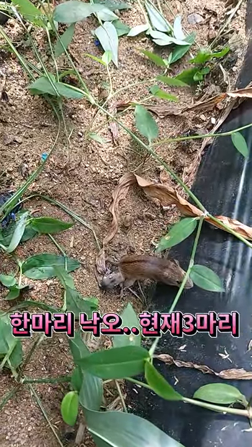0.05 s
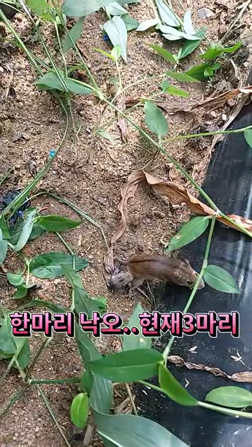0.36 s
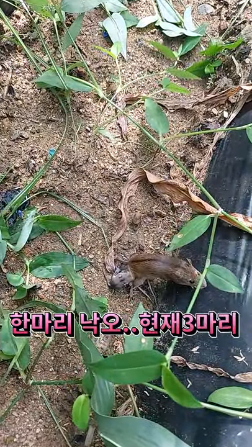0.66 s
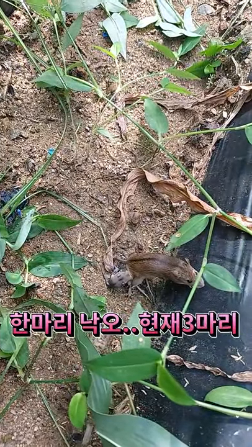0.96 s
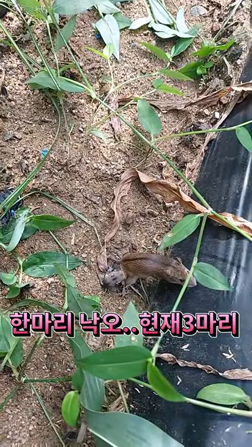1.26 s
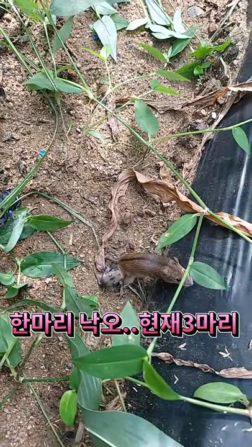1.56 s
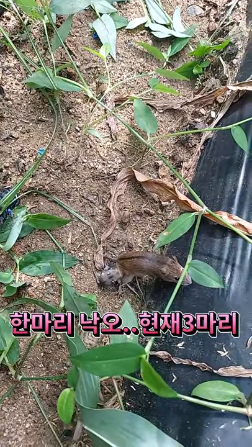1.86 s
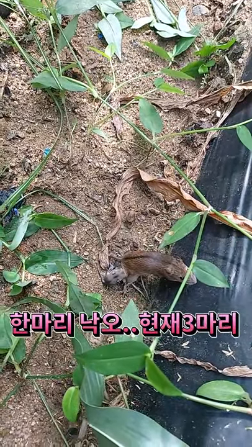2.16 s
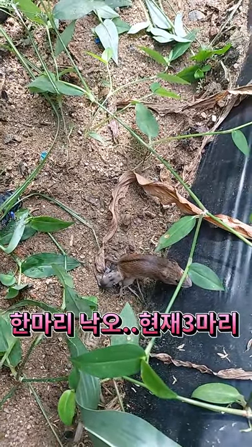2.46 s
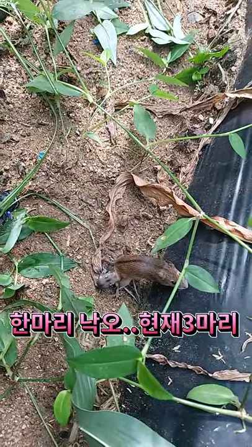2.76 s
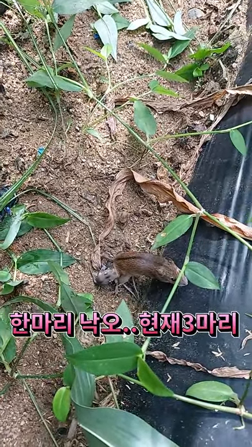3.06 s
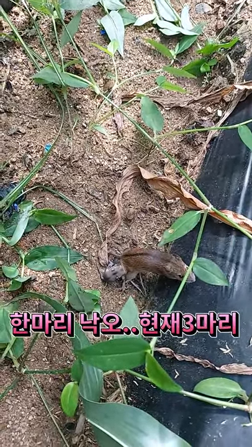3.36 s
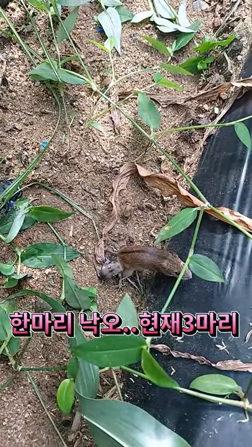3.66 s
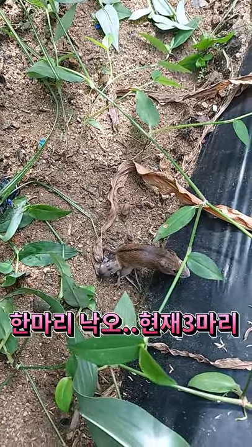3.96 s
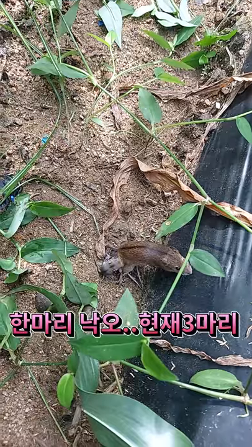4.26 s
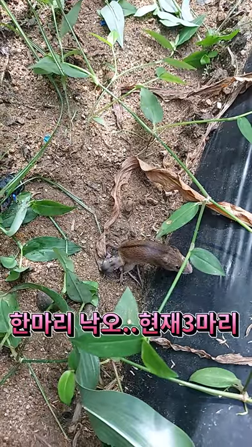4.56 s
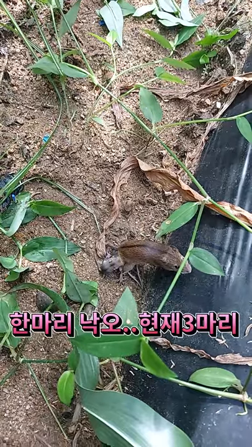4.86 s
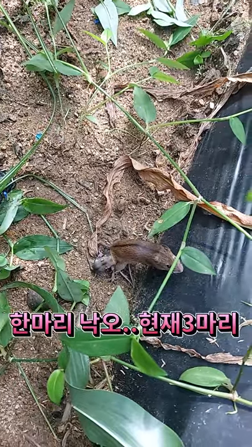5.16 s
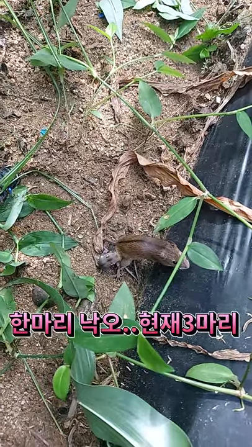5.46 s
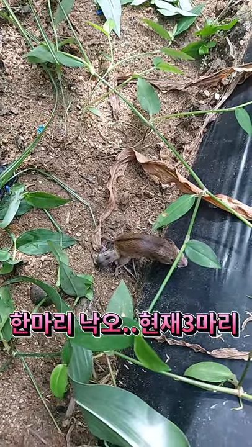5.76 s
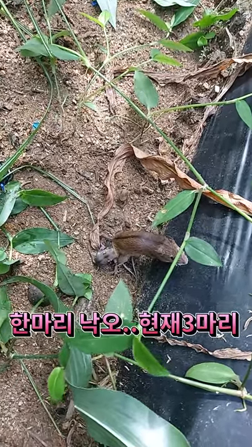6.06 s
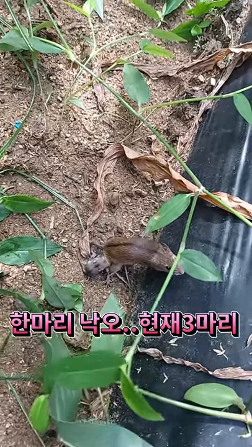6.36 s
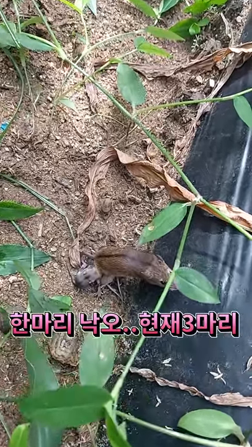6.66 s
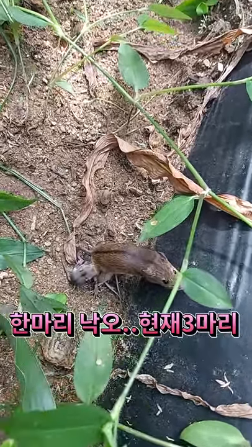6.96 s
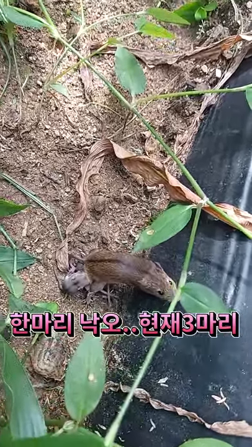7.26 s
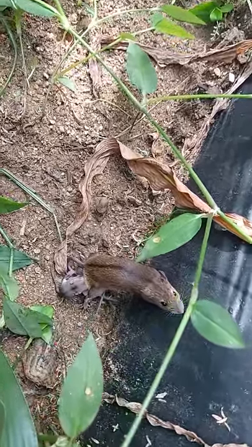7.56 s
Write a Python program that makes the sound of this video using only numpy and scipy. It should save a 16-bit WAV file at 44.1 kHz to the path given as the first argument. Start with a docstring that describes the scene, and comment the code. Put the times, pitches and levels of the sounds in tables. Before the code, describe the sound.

A steady, high-pitched chorus of cicadas fills a summer field throughout, heard through leaves from a hand-held microphone near the ground. From about 0.5 seconds one close cicada rings in short, buzzing pulses roughly twice a second, with thin, very high whizzes swelling between them. After about 4.3 seconds the pulses become fainter, and cicadas further off slide up into held drones until nearly 7 seconds. The high whizz dips around 5 seconds and returns, and the pulses grow stronger and overlap near the end, at about 7.5 seconds. A few soft handling knocks occur, the clearest at 1.2 seconds, with others around 1.5, 4.5 and 6.7 seconds. Leaves rustle lightly at the start and after 6 seconds. Underneath lie a faint low rumble and barely audible distant hoots, probably birds, around 2, 4 and 6 seconds.

```python
"""Cicadas in a summer field.

Heard through leaves, on the microphones of a hand-held camera near the ground. Several cicadas, one close,
buckle their ribs and pump their abdomens: ringing syllables about twice a second, with thin high whizzes
in between. Others drone further off over a wide chorus. Underneath lie a low rumble, a light rustle of
leaves, a few soft handling knocks and faint, distant hoots."""
import sys
import numpy as np
from scipy import signal
from scipy.fft import rfft, irfft, next_fast_len
from scipy.io import wavfile

SR = 44100
rng = np.random.default_rng(int(sys.argv[2]) if len(sys.argv) > 2 else 0)


def unload_wav(signal):
    """Save mono or channel-first audio to the path in sys.argv[1] as 16-bit WAV at rate SR, clipped to [-1, 1]."""
    wavfile.write(
        sys.argv[1],
        SR,
        np.round(np.clip(np.atleast_2d(signal).T, -1, 1) * 32767).astype(np.int16),
    )


N = 340452


def gain_of(db):
    """Decibels to amplitude."""
    return 10 ** (np.asarray(db) / 20)


def unit_rms(x):
    """Scales x to rms 1."""
    return x / np.sqrt(np.mean(x ** 2) + 1e-20)


def follow(rows):
    """A curve through (time [s], value) rows, at every sample."""
    return np.interp(np.arange(N) / SR, *np.transpose(rows))


def colour(x, points):
    """Filters x by a curve of (frequency [Hz], gain [dB]) points, then scales it to rms 1."""
    size = next_fast_len(x.shape[-1] + 1024)
    hz, db = np.transpose(points)
    gain = gain_of(np.interp(np.log(np.fft.rfftfreq(size, 1 / SR) + 1), np.log(hz), db))
    return unit_rms(irfft(rfft(x, size) * gain, size)[..., :x.shape[-1]])


def wander(size, per_s):
    """A random drift of rms about 1 that takes a new course per_s times a second."""
    knots = rng.standard_normal(4096)
    return np.interp(np.arange(size) / SR * per_s % 4095, np.arange(4096), knots) * np.sqrt(3 / 2)


def envelope(length, attack_s, release_s):
    """Smooth attack, hold and release."""
    t = np.arange(int(length * SR)) / SR
    rise = np.sin(np.pi / 2 * np.minimum(t / attack_s, 1))
    fall = np.sin(np.pi / 2 * np.minimum((length - t) / release_s, 1))
    return rise * fall


def pan(lean_db):
    """Gains at the two microphones, the left one louder by lean_db."""
    return gain_of(np.array([[lean_db], [-lean_db]]) / 2)


def add(mix, start, sound):
    """Adds a sound to the stereo mix at start seconds."""
    part = mix[:, max(round(start * SR), 0):][:, :sound.shape[1]]
    part += sound[:, :part.shape[1]]


def resonate(x, hz, width_hz):
    """A resonance of gain 1 that follows the curve hz."""
    turn = np.exp(2j * np.pi * np.cumsum(hz) / SR)
    pole = np.exp(-np.pi * width_hz / SR)
    return 2 * (turn * signal.lfilter([1 - pole], [1, -pole], x / turn)).real


def foliage(x, t60):
    """A diffuse echo off plants and ground, dying by 60 dB in t60 seconds."""
    t = np.arange(SR // 3) / SR
    tails = rng.standard_normal((2, len(t))) * gain_of(-60 * t / t60) * (t > .004)
    return signal.fftconvolve(x, tails / np.linalg.norm(tails[0]), axes=1)[:, :N]


def tymbal(rate_hz, rough, lo_hz, hi_hz, jitter, smear, apart=0.58):
    """The buzz of buckling ribs: harmonics of the click rate, and noise that pulses with each click."""
    size = len(rate_hz)
    unsteady_hz = rate_hz * (1 + jitter * wander(size, 120))
    angle = 2 * np.pi * (np.cumsum(unsteady_hz) / SR % 1)
    orders = np.arange(int(lo_hz / rate_hz.mean()), int(hi_hz / rate_hz.mean()))
    cycle = np.linspace(0, 2 * np.pi, 2049)
    # leaves smear each click, a little differently on the way to each microphone
    lag = smear * (rng.standard_normal((128, 1, 1)) + apart * rng.standard_normal((128, 2, 1)))[orders]
    click = np.cos(orders[:, None, None] * cycle + lag).sum(0)
    harmonics = unit_rms(np.array([np.interp(angle, cycle, side) for side in click]))
    # the two tymbals snap in turn, twice a cycle
    fizz = rng.standard_normal((2, size)) * (1 + 0.32 * np.cos(angle) + 0.35 * np.cos(2 * angle))
    band_share = 2 * (hi_hz - lo_hz) / SR
    return np.sqrt((1 - rough) * band_share) * harmonics + np.sqrt(rough) * unit_rms(fizz)


def far_chorus():
    """Across the field many cicadas merge into a wash, with four buzzes still standing out of it."""
    # spectrum of the chorus at the microphones (frequency [Hz], relative density [dB])
    spectrum = [(150, -30), (400, -28), (1000, -32.5), (1500, -30), (2000, -14), (2500, -6.5), (3100, -0.6),
                (4400, 2), (5400, -6), (6600, -3.5), (7400, -12.5), (9500, -18), (13000, -3), (16000, -27)]
    # slow swell of the chorus (time [s], level [dB])
    level = [(0, -40.5), (.75, -42), (1.4, -40.5), (2.1, -41.5), (4.0, -43.5), (4.45, -41.5), (5.7, -42.5),
             (6.5, -41), (7.72, -40.5)]
    wash = unit_rms(rng.standard_normal((2, N)))
    for rate_hz in np.linspace(172, 200, 4):
        buzz = tymbal(rate_hz * (1 + .008 * wander(N, 3)), 0.09, 2500, 9000, jitter=0.000985, smear=2.45)
        wash += gain_of(-9.5 + 2.7 * wander(N, 7)) * foliage(buzz, t60=0.11)
    return gain_of(follow(level) + 1.03 * wander(N, 14)) * pan(0.12) * colour(wash, spectrum)


def rumble():
    """Low outdoor rumble with a faint hum, much alike at both microphones but louder on the left."""
    # spectrum of the rumble (frequency [Hz], relative density [dB])
    spectrum = [(20, -44), (40, -9.5), (54, 3), (70, -1.5), (110, -2), (160, -12.5), (250, -20.5),
                (450, -32.5), (1000, -34), (3000, -107)]
    # rise and fall of the rumble (time [s], level [dB])
    level = [(0, -66.5), (1.15, -62.5), (1.42, -58.5), (1.75, -62.5), (2.3, -61.5), (3.6, -62),
             (4.3, -57.5), (4.5, -63), (6.2, -62.5), (6.55, -57.5), (7.1, -66), (7.72, -60)]
    # a low hum that swells and fades (time [s], level [dB])
    hum_level = [(0, -77), (1.2, -83), (1.4, -59.5), (2.5, -55.5), (3.5, -61.5), (4.1, -55), (4.8, -63),
                 (5.5, -72), (7.72, -78)]
    noise = colour(rng.standard_normal(N) + .5 * rng.standard_normal((2, N)), spectrum)
    hum_gain = gain_of(follow(hum_level) + 2.7 * wander(N, 4.3))
    hum_hz = 53.6 + 0.788 * wander(N, 3.34)
    hum = hum_gain * np.sin(2 * np.pi * np.cumsum(hum_hz) / SR)
    return pan(2.9) * (gain_of(follow(level) + 1.8 * wander(N, 8)) * noise + hum)


def drones():
    """Cicadas further off slide up to a wavering resonance and hold it, blurred by the plants between."""
    # their held notes (start [s], length [s], level [dB], resonance [Hz])
    notes = [(0, 0.54, -46, 4560), (4.372, .68, -42, 4450), (4.999, .66, -44.5, 4520),
             (5.171, .28, -50, 5230), (5.75, .22, -44, 4650), (6.099, 0.71, -47, 4540)]
    slide_share, slide_s, waver_hz = 0.35, 0.06, 110
    out = np.zeros((2, N))
    for start, length, db, top_hz in notes:
        swell = envelope(length, attack_s=0.11, release_s=0.077)
        size = len(swell)
        slack = np.exp(-(np.arange(size) / SR / slide_s) ** 2)
        hz = top_hz * (1 - slide_share * slack) + waver_hz * wander(size, 8)
        buzz = tymbal(187.5 * (1 + .007 * wander(size, 5)), 0.5, 2800, 8900, jitter=0.00278, smear=1.33)
        blurred = foliage(buzz, t60=0.096)[:, :size]
        ring = resonate(resonate(blurred, hz, width_hz=660), hz, width_hz=710)
        add(out, start, gain_of(db + wander(size, 25)) * swell * pan(2.2) * unit_rms(ring))
    return out


def whizzes():
    """With an abdomen drawn in, the ribs' high ring is left, gliding through the leaves' echoes."""
    # the unbroken whizz of the neighbours (time [s], level [dB])
    far_level = [(0, -29.5), (.08, -38), (.6, -39.5), (1.6, -39), (2.2, -38.5), (2.9, -43), (5.15, -48.5),
                 (5.72, -38.5), (6.4, -37.5), (7.72, -36.5)]
    # high whizzes that swell between the syllables, from more than one cicada
    # (start [s], length [s], level [dB], click rate [Hz], roughness [0-1])
    swelling_whizzes = [(0.19, .37, -34.5, 168, 0.26), (0.662, .36, -33, 168.3, 0.4),
                        (1.089, 0.35, -38, 184, 0.4), (1.581, 0.36, -40.5, 184, 0.2),
                        (2.12, 0.28, -36, 184.3, 0.3), (2.548, .30, -35, 185.6, 0.08),
                        (2.948, .35, -33.5, 186.7, 0.1), (3.369, 0.35, -32, 187.2, 0.14),
                        (3.798, .36, -32.5, 186.7, .2), (4.231, .22, -34, 178.2, 0.16),
                        (4.806, 0.29, -47.5, 192, 0.5), (5.178, 0.33, -43, 191.6, .6)]
    # the ring of the ribs (frequency [Hz], relative density [dB])
    spectrum = [(2000, -32), (2200, -17.5), (2270, -15), (2420, -25), (2650, -17), (4000, -36), (8000, -56),
                (10000, -37), (11000, -17), (11850, -9), (12100, -3), (12400, -4), (13300, 0),
                (14500, -0.5), (15800, -4.5)]
    creep_share, growth_db = .008, 5.5
    far_hz = 184.5 * (1 + .005 * wander(N, 3.6))
    far_gain = gain_of(follow(far_level) + .8 * wander(N, 11))
    buzz = far_gain * tymbal(far_hz, 0.87, 2100, 17000, jitter=0.000823, smear=0.66)
    for start, length, db, rate_hz, rough in swelling_whizzes:
        swell = envelope(length, attack_s=0.065, release_s=0.089)
        progress = np.linspace(0, 1, len(swell))
        glide_hz = rate_hz * (1 + creep_share * progress)
        ribs = tymbal(glide_hz, rough, 2100, 15700, jitter=0.00074, smear=0.99)
        add(buzz, start, gain_of(db + growth_db * (progress - .5)) * swell * ribs)
    scattered = gain_of(-4.5) * buzz + foliage(buzz, t60=0.078)
    return buzz.std() * pan(.4) * colour(scattered, spectrum)


def leaf_rustle():
    """Leaves to the right stir without a break and brush, grainy and light, as the camera moves."""
    # brushes of the leaves (start [s], length [s], level [dB])
    brushes = [(0, 0.45, -60), (0.62, 0.21, -60), (1.046, .6, -70), (6.007, 0.84, -57.5), (6.89, 0.31, -63),
               (7.48, 0.3, -59)]
    # spectrum of the leaves (frequency [Hz], relative density [dB])
    spectrum = [(100, -18), (350, -8.5), (900, -11), (1450, 0), (2500, 1.5), (6000, -8), (12000, -11.5)]
    grains = rng.standard_normal((2, N)) * gain_of(3.04 * wander(N, 150))
    stir = np.full((2, N), gain_of(-72))
    for start, length, db in brushes:
        add(stir, start, gain_of(db) * envelope(length, attack_s=0.023, release_s=.12)[None])
    return stir * pan(-4.3) * colour(grains, spectrum)


def cicada_syllables():
    """Several cicadas ring, one close and others fainter; each resonance arches as the click rate sags."""
    # one row a syllable (start [s], length [s], level [dB], top of the resonance [Hz],
    # click rate [Hz], roughness [0-1], left over right [dB])
    syllables = [(0.018, 0.17, -44.5, 4750, 193.6, 0.36, 7), (0.492, 0.19, -38.5, 4670, 176.8, 0.46, 1.5),
                 (0.95, 0.17, -37, 4580, 170.7, 0.56, 2), (1.431, 0.15, -37.5, 4740, 190.3, 0.25, 3),
                 (1.904, 0.16, -36, 4710, 189.2, 0.04, 2.5), (2.349, 0.18, -36, 4740, 190.4, 0.06, 3.5),
                 (2.802, 0.18, -37, 4730, 189.6, 0.1, 3), (3.245, 0.17, -37, 4700, 190.3, 0.08, 2),
                 (3.676, 0.19, -37, 4670, 189.3, 0.13, 2), (4.1, 0.21, -37.5, 4640, 188.8, 0.11, 1),
                 (4.622, 0.14, -44.5, 4720, 196.3, 0.14, 3), (5.047, 0.13, -46, 4700, 196.7, 0.06, 4),
                 (5.481, 0.15, -44, 4720, 196.6, 0.2, 8), (5.898, 0.16, -45, 4700, 195.7, 0.14, 4),
                 (6.18, 0.19, -46, 4720, 195.7, 0.1, 0), (6.729, 0.15, -48.5, 4720, 190.3, 0.1, 2),
                 (6.946, 0.15, -44, 4800, 189, 0.2, 4), (7.09, 0.14, -40, 4430, 189, 0.2, 1),
                 (7.419, 0.17, -43, 4820, 190.4, 0.3, 2), (7.547, 0.16, -38.5, 4470, 192.5, 0.11, 3)]
    # a cicada's body with the abdomen stretched (frequency [Hz], relative gain [dB])
    stretched_body = [(1500, -52), (2400, -10), (3200, -4), (3800, 6), (4150, -1), (4380, 10), (4570, -4),
                      (4760, 10.5), (5300, -3), (6500, 1), (7400, -4), (8300, -0.5), (9500, -16),
                      (11000, -42)]
    body_peak_hz, stretch_db, fade_db = 4760, 4.5, 4
    moving_share, slack_share, sag_share = 0.69, 0.29, .014
    out = np.zeros((2, N))
    for start, length, db, top_hz, rate_hz, rough, lean_db in syllables:
        progress = np.linspace(0, 1, int(length * SR))
        stretch = signal.windows.tukey(len(progress), moving_share)  # an abdomen stretches and relaxes
        sagging_hz = rate_hz * (1 - sag_share * progress ** 5)
        buzz = tymbal(sagging_hz, rough, 1700, 10000, jitter=0.0013, smear=1.45, apart=0.37)
        body = np.array(stretched_body) * [top_hz / body_peak_hz, 1]  # all peaks shift with the top
        # a hoarse syllable rings less: flatter peaks and a wider resonance
        body[:, 1] -= 0.8 * rough * np.maximum(body[:, 1], 0)
        abdomen_hz = top_hz * (1 - slack_share * (1 - stretch))
        ring = resonate(colour(buzz, body), abdomen_hz, width_hz=604 + 600 * rough)
        swell_db = stretch_db * stretch - fade_db * progress ** 3 + 0.91 * wander(len(progress), 87.7)
        swell = envelope(length, attack_s=0.016, release_s=0.042) * gain_of(swell_db)
        add(out, start, gain_of(db) * pan(lean_db) * unit_rms(ring * swell))
    return out


def handling_knocks():
    """The hand knocks on the camera and the stems: short damped rings, mostly in the right microphone."""
    # the knocks (time [s], peak before panning [dB], pitch [Hz], decay t60 [s])
    knocks = [(0.656, -56.5, 397, 0.054), (0.70, -65, 600, 0.046), (1.2353, -27.5, 1920, 0.013),
              (1.506, -39, 1730, 0.014), (3.679, -52, 1700, 0.018), (4.473, -46.5, 1780, .05),
              (6.494, -51, 1200, .04), (6.734, -45.5, 1900, 0.017), (6.752, -52.5, 245, 0.072)]
    # the modes a knock rings with (frequency [multiple of its pitch], relative level [dB])
    modes = [(.3, -12.5), (.55, -12.5), (.89, -1), (1.1, 2.5), (1.3, -2), (2.4, -6.5), (4.2, -15)]
    out = np.zeros((2, N))
    t = np.arange(SR // 8) / SR
    for start, db, hz, t60 in knocks:
        ring = sum(gain_of(mode_db) * np.sin(2 * np.pi * (hz * ratio * t + rng.random()))
                   for ratio, mode_db in modes)
        knock = ring * gain_of(-60 * t / t60) * (1 - np.exp(-t / .0004))
        add(out, start, gain_of(db) * pan(-8.0) * knock / abs(knock).max())
    return out


def far_hoots():
    """Soft, slightly arched single notes far away, probably birds; the low ones are hoarse."""
    # the hoots (start [s], length [s], level [dB], pitch [Hz], roughness [0-1])
    calls = [(2.03, 0.43, -76.5, 420, 0.95), (4.043, 0.13, -72.5, 794, 0.37), (4.42, 0.1, -78, 777, 0.37),
             (6.059, 0.39, -74, 428, 0.7)]
    out = np.zeros((2, N))
    for start, length, db, hz, rough in calls:
        arch = signal.windows.tukey(int(length * SR), .7)
        tone = np.sin(2 * np.pi * np.cumsum(hz * (1 - 0.025 * (1 - arch))) / SR)
        flutter = 1 - rough + rough * wander(len(arch), 200)
        add(out, start, gain_of(db) * pan(0) * unit_rms(arch * tone * flutter))
    return out + gain_of(-2.5) * foliage(out, t60=0.32)


def scene():
    """The cicadas' syllables with their echo, over the rest of the field."""
    syllables = cicada_syllables()
    echo = gain_of(-9.5) * foliage(syllables, t60=0.85)
    cicadas = syllables + echo + whizzes() + drones() + far_chorus()
    return cicadas + rumble() + far_hoots() + leaf_rustle() + handling_knocks()


def record(dry):
    """The right microphone faces away and loses treble; the recorder cuts the very top of both sides."""
    # shading of the right microphone (frequency [Hz], gain [dB])
    shade = [(4500, 0), (6000, -4.5), (8000, -5.5), (12000, -9.5)]
    shade_gain = gain_of(np.interp(np.fft.rfftfreq(N, 1 / SR), *np.transpose(shade)))
    right = irfft(rfft(dry[1]) * shade_gain, N)
    band_limit = signal.firwin(1023, cutoff=15850, window=("kaiser", 8), fs=SR)
    return signal.oaconvolve([dry[0], right], band_limit[None], "same", axes=1)


dry = scene()
out = record(dry)
unload_wav(out)
```